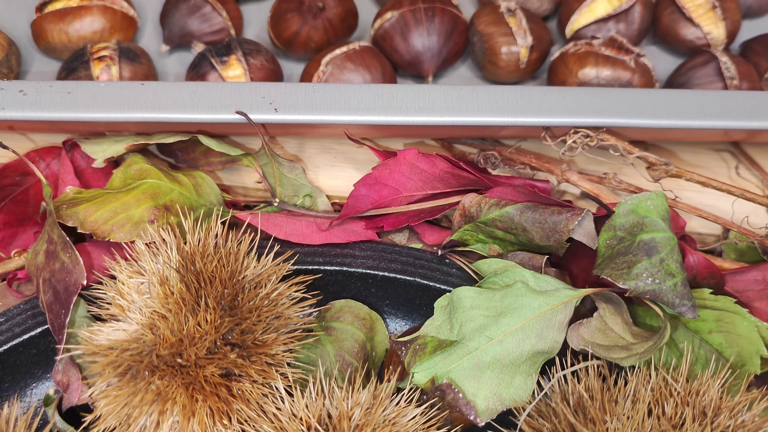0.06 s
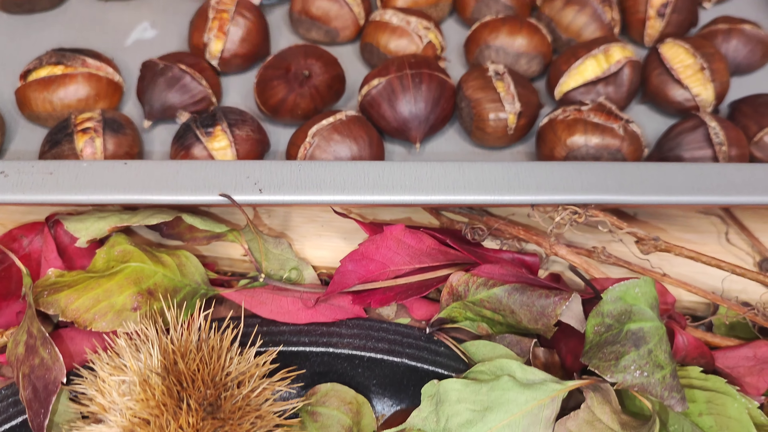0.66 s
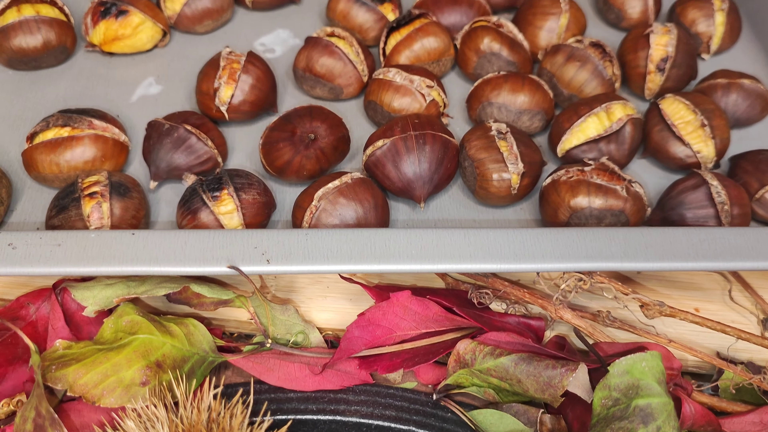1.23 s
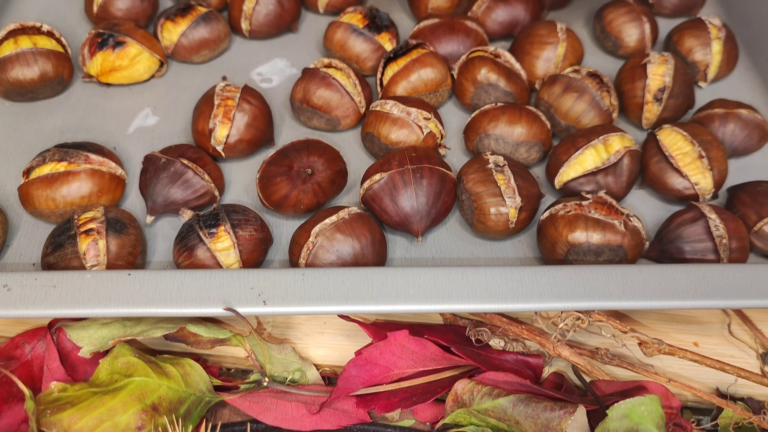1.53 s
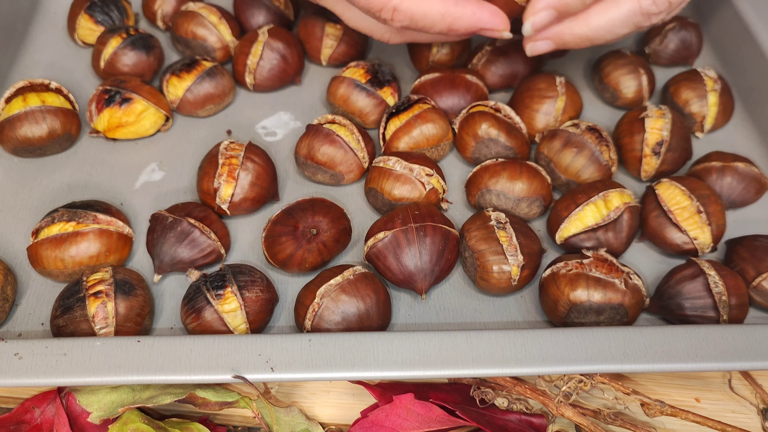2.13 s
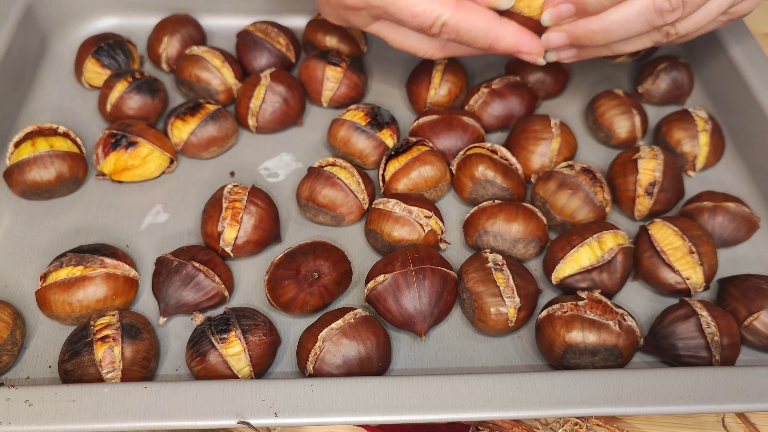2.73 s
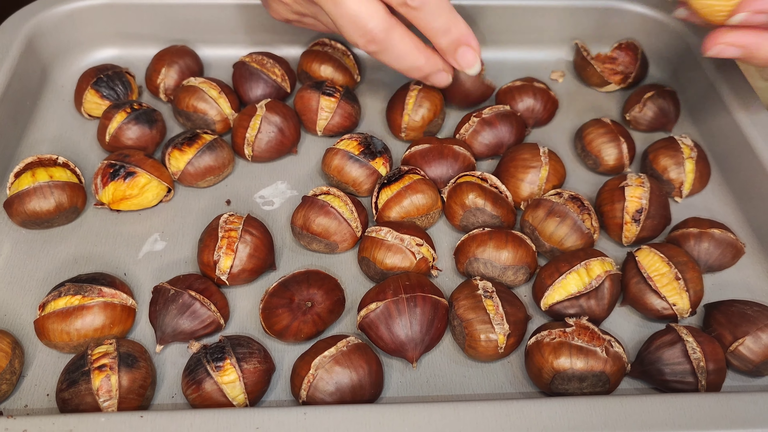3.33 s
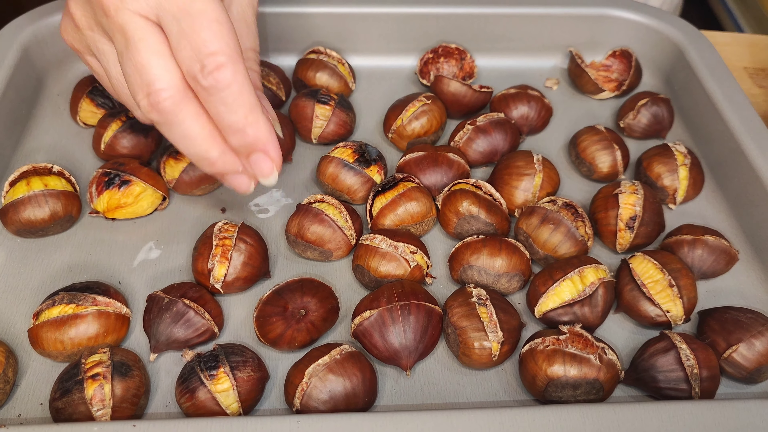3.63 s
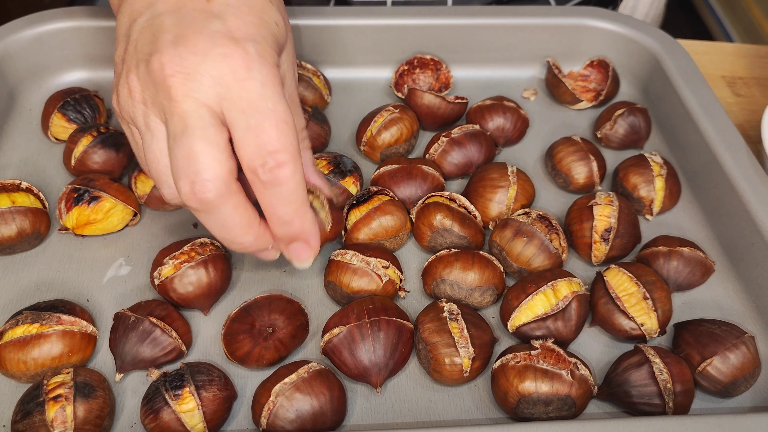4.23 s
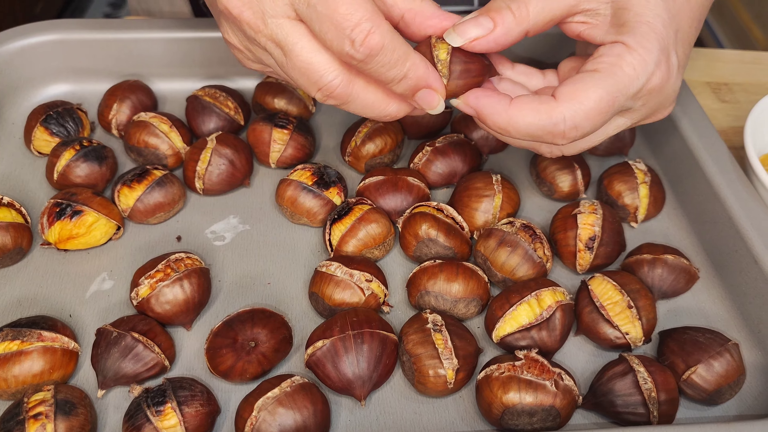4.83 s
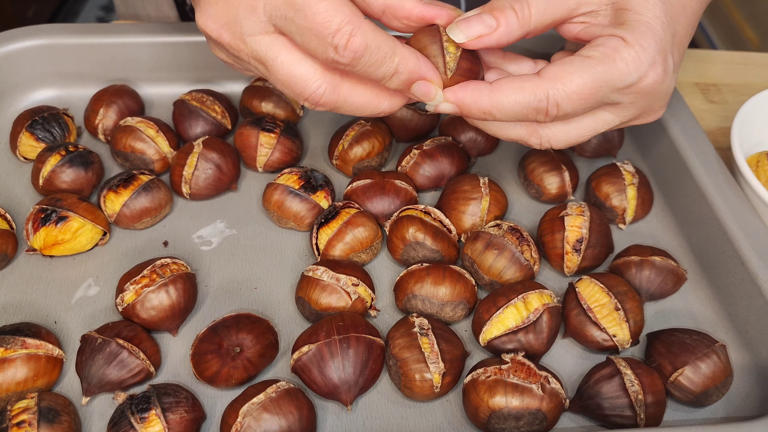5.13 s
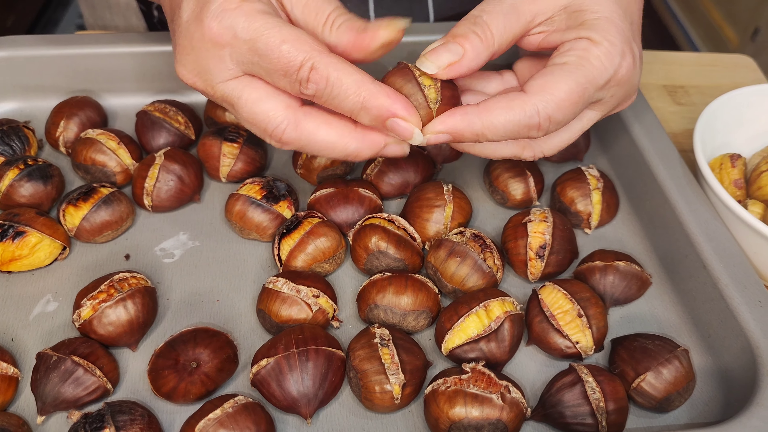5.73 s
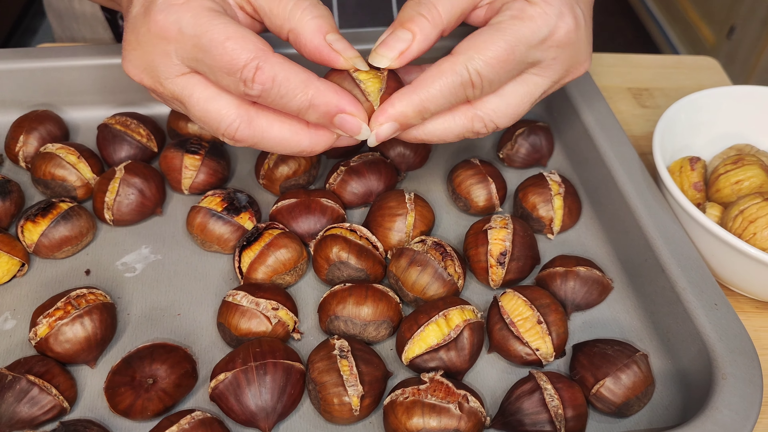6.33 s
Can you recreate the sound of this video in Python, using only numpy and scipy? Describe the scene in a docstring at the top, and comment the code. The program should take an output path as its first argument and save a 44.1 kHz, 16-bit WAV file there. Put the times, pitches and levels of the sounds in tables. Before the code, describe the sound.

Roasted chestnuts roll and knock lightly on a metal baking tray. Fingers rub over one and split its brittle shell in quick runs of crisp snaps. Midway, a piece of shell drops and bounces on the tray with a brief ring, and more nuts are nudged together. The peeling then resumes, ending in a sharp crack. It all sounds close, in a quiet kitchen with short echoes.

```python
"""First, fingers rub softly over a roasted chestnut in a quiet kitchen.
Nudged nuts roll and knock together, and the metal baking tray rings under them.
Each pull splits the brittle shell in a quick run of snaps that share one short hollow ring;
a deep crack also jolts the nut. Midway, a piece of shell drops and bounces on the tray,
then the peeling goes on. The small room answers with short echoes."""
import sys
import numpy as np
from scipy import signal
from scipy.fft import rfft, irfft
from scipy.io import wavfile
from scipy.ndimage import uniform_filter1d

SR = 44100
rng = np.random.default_rng(int(sys.argv[2]) if len(sys.argv) > 2 else 0)


def wav_record(signal):
    """Record a signal, one row per channel, as 16-bit PCM in the file named by sys.argv[1]."""
    frames = np.transpose(np.atleast_2d(signal))
    bounded = np.clip(frames, -1, 1)
    # unit amplitude maps onto the largest positive 16-bit level
    quanta = np.round(bounded * 32767).astype(np.int16)
    wavfile.write(sys.argv[1], SR, quanta)


N = 290001
PULSE_SIZE, TAIL_SIZE = 2048, 22050   # samples in one hit, and in its fading tail
FREQS = np.arange(PULSE_SIZE // 2 + 1) * SR / PULSE_SIZE


def from_db(db):
    """Turn decibels into a number to multiply a sound by."""
    return 10 ** (np.asarray(db) / 20)


def unit(x):
    """Scale a sound so its channels have an average energy of 1."""
    return x / np.sqrt(np.mean(np.sum(x ** 2, axis=-1)) + 1e-20)


def at_hz(points, hz):
    """Read between a table's rows, with octaves evenly spaced."""
    pitch_hz, value = np.transpose(points)
    return np.interp(np.log(hz + 1), np.log(pitch_hz), value)


def fade(fade_s, size):
    """A curve that falls 60 dB in fade_s seconds."""
    return np.exp(-np.log(1000) * np.arange(size) / SR / fade_s)


def bass_and_treble(bass_db, bass_hz, treble_db, treble_hz):
    """Two tone knobs: one for the lows, one for the highs."""
    lows = 1 / (1 + (FREQS / bass_hz) ** 8)
    highs = 1 - 1 / (1 + (FREQS / treble_hz) ** 8)
    return from_db(bass_db * lows + treble_db * highs)


def resonance(hz, sharpness):
    """Let one pitch through fully and weaken those around it."""
    return 1 / np.hypot(1, sharpness * (FREQS / hz - hz / (FREQS + 1)))


def pulse(gain):
    """The shortest click with this tone colour (one gain for each pitch)."""
    cepstrum = irfft(np.log(gain + 1e-9))
    cepstrum[1:PULSE_SIZE // 2] *= 2   # folding onto the first half packs the energy at the start
    cepstrum[PULSE_SIZE // 2 + 1:] = 0
    return irfft(np.exp(rfft(cepstrum)))


def through(x, response):
    """Give a sound the colour and echoes held in a response."""
    return signal.fftconvolve(np.atleast_2d(x), np.atleast_2d(response), axes=1)


def add(track, start_s, sound):
    """Mix a sound into a track."""
    start = max(0, int(start_s * SR))
    part = track[:, start:start + sound.shape[-1]]
    part += sound[..., :part.shape[-1]]


def burst(fade_s, channels):
    """A fading puff of noise, about equally strong at all pitches."""
    noise = rng.standard_normal((channels, PULSE_SIZE)) * fade(fade_s, PULSE_SIZE)
    spectrum = rfft(noise, 2 * PULSE_SIZE)
    colour = np.sqrt(uniform_filter1d(abs(spectrum) ** 2, size=61, axis=1))
    return unit(irfft(spectrum / colour)[:, :PULSE_SIZE])


def contact(run_db, run_fade_s, scatter_db, scatter_fade_s, left_lead_s=0.00023):
    """A touch and a run of smaller ones reach the left side first; hands and tray scatter more."""
    direct = from_db(run_db) * burst(run_fade_s, channels=1)[0]
    direct[0] += 1
    paths = unit(np.array([direct, np.roll(direct, int(left_lead_s * SR))]))
    return unit(paths + from_db(scatter_db) * burst(scatter_fade_s, channels=2))


# How long the kitchen rings: pitch_hz, fade_s
KITCHEN_FADES = [(300, .42), (1300, 0.33), (3500, 0.35), (6000, 0.34), (9500, 0.2), (15000, 0.22)]
def kitchen(echo_s, echo_db, tail_db):
    """A nearby surface sends back one blurred echo; then the room fades, the highs first."""
    edges_hz = np.geomspace(150, 17000, 11)
    tail = np.zeros((2, TAIL_SIZE))
    for low, high in zip(edges_hz, edges_hz[1:]):
        band_filter = signal.butter(2, [low, high], "band", fs=SR, output="sos")
        band = signal.sosfilt(band_filter, rng.standard_normal((2, TAIL_SIZE)))
        tail += band * fade(at_hz(KITCHEN_FADES, np.sqrt(low * high)), TAIL_SIZE)
    swell = 1 - fade(0.0096, TAIL_SIZE)
    response = from_db(tail_db) * unit(tail * swell)
    add(response, echo_s, from_db(echo_db) * burst(0.016, channels=2))
    return response


# Tone colour of the quiet room: pitch_hz, level_db
HUSH_COLOUR = [(20, 2.5), (40, 2), (100, -2.5), (170, -3.5), (280, -6.5), (420, -15.5), (700, -15.5),
               (1200, -21), (2300, -24.5), (5400, -27), (8200, -32), (16000, -31.5)]
def room_hush(level_db):
    """Low rumble and faint hiss come from all directions."""
    noise = rng.standard_normal((2, N + PULSE_SIZE))
    hush = through(noise, pulse(from_db(at_hz(HUSH_COLOUR, FREQS))))
    return from_db(level_db) * np.sqrt(N) * unit(hush[:, PULSE_SIZE:PULSE_SIZE + N])


def friction(strokes, colour, catches_per_s, spread_db, room_db):
    """A sliding surface catches in tiny clicks that swell and fade with each stroke."""
    catches = np.zeros((1, N))
    for middle_s, length_s, db in strokes:
        size = int(length_s * SR)
        clicks = (rng.random(size) < catches_per_s / SR) * rng.choice([-1, 1], size)
        clicks = unit(clicks * from_db(rng.normal(0, spread_db, size)))
        add(catches, middle_s - length_s / 2, from_db(db) * np.sqrt(size) * clicks * np.hanning(size))
    paths = kitchen(echo_s=0.017, echo_db=-12.5, tail_db=room_db)
    add(paths, 0, contact(run_db=-15.5, run_fade_s=0.0058, scatter_db=8, scatter_fade_s=0.037))
    one_catch = pulse(from_db(at_hz(colour, FREQS)))
    return through(catches, unit(through(one_catch, paths)))[:, :N]


# Finger strokes: middle_s, length_s, level_db
FINGER_STROKES = [(.05, .11, -60), (1.11, 0.29, -64.5), (1.37, 0.2, -53), (1.93, 0.31, -54.5),
                  (2.47, 0.16, -69.5), (3.31, 0.35, -59), (4.71, .29, -58.5), (5.2, 0.1, -65.5)]
# Tone colour of skin on shell: pitch_hz, level_db
SKIN_COLOUR = [(300, -21), (1000, -12.5), (2200, -9), (3500, -6.5), (5400, -5.5), (7200, -11.5),
               (9500, -12.5), (16000, -19.5)]
def rubbing_fingers():
    """Skin drags over a shell with a fine, uneven rustle."""
    return friction(FINGER_STROKES, SKIN_COLOUR, catches_per_s=5600, spread_db=8.5, room_db=-7.5)


# Low scrapes: short rolls of nuts on the tray, and one long, low rub of fingers on the shell near 4.8 s:
# middle_s, length_s, level_db
LOW_SCRAPES = [(.33, .071, -52.5), (.53, 0.15, -69.5), (.645, 0.11, -53), (3.936, 0.028, -57),
               (4.17, 0.093, -53.5), (4.35, .056, -55), (4.45, .06, -60.5), (4.78, 0.42, -66.5)]
# Tone colour of a low scrape: pitch_hz, level_db
SCRAPE_COLOUR = [(100, -27), (300, -3), (600, 1), (1100, 2.5), (3000, -2.5), (5000, -8), (8000, -18),
                 (16000, -29)]
def low_scrapes():
    """Nuts roll and scuff on the tray, and fingers rub low on the shell, each with a low, even scrape."""
    return friction(LOW_SCRAPES, SCRAPE_COLOUR, catches_per_s=1300, spread_db=1.0, room_db=-8.5)


# The notes the tray rings with: pitch_hz, level_db, fade_s
TRAY_NOTES = [(440, -15.5, 0.2), (1270, -5.5, 0.27), (1432, 0.5, 0.15), (1690, -6.5, 0.29),
              (1651, -2, 0.068), (2155, -1.5, .2), (2571.5, -8.5, 0.14), (2600, -7, 0.13),
              (3070, -7.5, 0.069)]
def tray_hits(hits, colour, ring_db, clack_s=0.028):
    """A hard shell gives a short woody clack and sets the loaded tray ringing."""
    out, t = np.zeros((2, N)), np.arange(TAIL_SIZE) / SR
    notes = np.array([from_db(db) * np.sin(2 * np.pi * hz * t) * fade(fade_s, TAIL_SIZE)
                      for hz, db, fade_s in TRAY_NOTES])
    # each spot on the tray echoes differently
    rooms = [kitchen(echo_s=0.011, echo_db=-8.5, tail_db=-6.5) for _ in range(4)]
    for k, (start_s, db, bass_db, treble_db) in enumerate(hits):
        tone = bass_and_treble(bass_db, 1000, treble_db, 3600)
        clack = unit(pulse(from_db(at_hz(colour, FREQS)) * tone))
        paths = rooms[k % len(rooms)].copy()
        add(paths, 0, contact(run_db=9.5, run_fade_s=clack_s, scatter_db=1.5, scatter_fade_s=clack_s))
        add(out, start_s, from_db(db) * through(clack, paths))
        signs = rng.choice([-1, 1], (2, len(notes)))
        strengths = signs * from_db(rng.normal(0, 0.91, signs.shape))
        add(out, start_s, from_db(db + ring_db) * unit(strengths @ notes))
    return out


# Bumps between nuts: start_s, level_db, bass_db, treble_db
NUT_KNOCKS = [(0.3096, -24.5, 4, 8), (0.3306, -19, 4, 5), (0.4135, -26.5, 11, -4),
              (0.6121, -22.5, 6.5, -6.5), (0.7708, -16, 5.5, -8.5), (3.9424, -18, 0.5, -0.5),
              (4.0488, -19.5, -2.5, -7), (4.086, -24.5, 3, -5.5), (4.1686, -24.5, 4, -15),
              (4.2881, -34, 12, -16.5), (4.402, -25, 11, 6), (4.4161, -21.5, 17.5, 0)]
# Tone colour of a knock: pitch_hz, level_db
KNOCK_COLOUR = [(100, -57), (300, -10.5), (450, -8), (700, -11), (1100, 1), (1600, -3.5), (2300, -0.5),
                (3300, -5.5), (5000, -12), (8000, -21), (16000, -27)]
def knocking_nuts():
    """Whole nuts are nudged and knock together on the tray."""
    return tray_hits(NUT_KNOCKS, KNOCK_COLOUR, ring_db=-10.5)


# The clear breaks in the shell: start_s, level_db
SHELL_BREAKS = [(0.7187, -32), (1.3168, -12.5), (1.393, -22.5), (1.4944, -11), (1.501, -3.5),
                (1.5493, -10.5), (1.5609, -9.5), (1.5851, -6), (1.6986, -22), (1.7023, -4.5), (1.7215, -8),
                (1.8405, -25.5), (1.8755, -26), (1.8943, -24.5), (1.9608, -17), (2.0572, -10.5),
                (2.0637, -7), (2.5736, -15.5), (2.834, -5), (2.8846, -19.5), (2.964, -18), (2.992, -14.5),
                (3.0059, -13.5), (3.0322, -20.5), (3.0892, -16.5), (3.1051, -12.5), (5.1125, -22.5),
                (5.1614, -25.5), (5.2695, -8), (5.337, -24.5), (5.4073, -6), (5.4333, -15.5), (5.6257, -26),
                (5.652, -14.5), (5.6571, -11), (5.6893, -4.5), (5.7356, -8.5), (6.459, -11), (6.494, -9),
                (6.523, -21), (6.5475, 2.5), (6.5676, -4.5)]
# Each pull loosens one piece, and its cracks share that piece's colour:
# start_s, length_s, ring_hz, ring_share (0 to 1), hollow_db, treble_db
SHELL_PULLS = [(1.181, 0.26, 5600, 0.25, 13, 4.5), (1.472, .07, 5870, 0.51, 8.5, 0.5),
               (1.544, 0.13, 5800, 0.26, -1, 3.5), (1.694, 0.077, 6300, .12, 1.5, 1.5),
               (1.827, 0.11, 5470, 0.04, 6.5, 15), (2.025, 0.032, 5050, 0.1, -18, -9.5),
               (2.484, 0.22, 4270, 0.07, 1, 1.5), (2.789, 0.085, 2820, 0.09, 15, 6),
               (2.943, .18, 3440, 0.4, 5.5, -2), (4.839, .03, 6420, .1, -0.5, 4),
               (5.094, 0.57, 4300, 0.08, -3.5, 3), (5.605, .06, 3750, 0.15, -6, 0),
               (5.664, 0.055, 6350, 0.05, 0, 5), (6.13, 0.079, 4530, 0, 0, -3.5),
               (6.44, .09, 3160, 0.16, 1, 2.5), (6.535, 0.032, 6500, 0.34, -1, -3.5)]
def shell_cracks(ticks_per_s=14, tick_db=-35, tick_spread_db=2.5):
    """List the breaks, plus faint ticks as single fibres give way at random during each pull."""
    breaks, cracks = list(SHELL_BREAKS), []
    for start_s, length_s, *_ in SHELL_PULLS:
        for when, strength in rng.random((int(np.ceil(ticks_per_s * length_s)), 2)):
            breaks.append((start_s + when * length_s, tick_db + tick_spread_db * (2 * strength - 1)))
    pull_starts = [row[0] for row in SHELL_PULLS]
    for start_s, db in breaks:
        pull = max(0, np.searchsorted(pull_starts, start_s) - 1)
        ring_hz, ring_share, hollow_db, treble_db = SHELL_PULLS[pull][2:]
        ring_hz *= np.exp(0.02 * rng.standard_normal())   # no two cracks ring quite alike
        treble_db += 0.17 * (-10 - db)   # the smaller the crack, the brighter
        cracks.append((start_s, db, ring_hz, ring_share, hollow_db, treble_db))
    return cracks


def snapping_shell(hollow_hz, hollow_sharpness, gain_db):
    """Each crack is coloured by the hollow under the shell, and the piece that lets go rings briefly."""
    out = np.zeros((2, N))
    # the nut turns, so the echoes change
    rooms = [kitchen(echo_s=0.009, echo_db=-6.0, tail_db=-4.0) for _ in range(6)]
    for k, (start_s, db, ring_hz, ring_share, hollow_db, treble_db) in enumerate(shell_cracks()):
        hollow = from_db(hollow_db - 6.0) * resonance(hollow_hz, hollow_sharpness) ** 2
        crack = unit(np.hypot(bare_crack(treble_db), hollow))
        ring = unit(resonance(ring_hz, sharpness=3 + 6 * ring_share) ** 2)
        snap = unit(pulse(np.sqrt((1 - ring_share) * crack ** 2 + ring_share * ring ** 2)))
        paths = rooms[k % len(rooms)].copy()
        add(paths, 0, contact(run_db=4.5, run_fade_s=0.0042, scatter_db=4.5, scatter_fade_s=0.017))
        add(out, start_s, from_db(db + gain_db) * through(snap, paths))
    return out


# Tone colour of splitting shell: pitch_hz, level_db
CRACK_COLOUR = [(150, -39.5), (500, -24.5), (950, -22.5), (1400, -12.5), (1900, -14.5), (2600, -12.5),
                (3500, -2.5), (5500, -1), (7400, -3), (9000, -1.5), (12000, -7), (16000, -9)]
def bare_crack(treble_db):
    """The gain at each pitch for one crack: brittle shell sounds broad and bright."""
    return from_db(at_hz(CRACK_COLOUR, FREQS)) * bass_and_treble(0, 1000, treble_db, 9000)


def jolting_nut(wood_hz, wood_sharpness, deep_db, jolt_db):
    """A break louder than deep_db makes the whole nut kick back in the fingers with a dull knock."""
    kicks = np.zeros((1, N))
    for start_s, db in SHELL_BREAKS:
        if db > deep_db:
            add(kicks, start_s, from_db([jolt_db + 0.17 * (db - deep_db)]))
    paths = kitchen(echo_s=0.011, echo_db=-37.5, tail_db=-5.0)
    add(paths, 0, contact(run_db=7, run_fade_s=0.0062, scatter_db=5.5, scatter_fade_s=0.0027))
    knock = unit(pulse(resonance(wood_hz, wood_sharpness) ** 2))
    return through(kicks, through(knock, paths))[:, :N]


# A landing and its bounces: start_s, level_db, bass_db, treble_db
SHELL_BOUNCES = [(3.402, 9, -4.5, 1), (3.4422, 2, -2, -2), (3.4709, -7, -12, 0.5), (3.5177, -17.5, -3.5, 4)]
# Tone colour of light shell on the tray: pitch_hz, level_db
BOUNCE_COLOUR = [(100, -37), (300, -25), (480, -9.5), (750, -7), (950, -12.5), (1280, 2.5), (1650, -1),
                 (1900, -6), (2300, 1), (3300, -6.5), (5000, -17.5), (8000, -25), (16000, -35.5)]
def falling_shell():
    """A piece of shell lands on the tray and bounces, softer each time."""
    return tray_hits(SHELL_BOUNCES, BOUNCE_COLOUR, ring_db=-9.0)


# How the microphone's two openings differ: pitch_hz, left_minus_right_db
SIDE_BALANCE = [(500, 2), (1400, -0.5), (2400, -5), (3400, -6.5), (5000, -7), (8000, -1), (13000, 2.5)]
def microphone_openings(x):
    """Each opening colours the sound from the tray in its own way."""
    half_db = at_hz(SIDE_BALANCE, FREQS) / 2
    return through(x, [pulse(from_db(half_db)), pulse(from_db(-half_db))])[:, :N]


def narrow_bass(x, below_hz, side_db):
    """Long waves reach both openings alike, so low sounds sit nearer the middle."""
    middle, side = (x[0] + x[1]) / 2, (x[0] - x[1]) / 2
    bass_cut = pulse(from_db(side_db / (1 + (FREQS / below_hz) ** 4)))
    side = through(side, bass_cut)[0, :N]
    return np.array([middle + side, middle - side])


def scene():
    """Mix the peeling hands, the nuts on the tray and the quiet kitchen."""
    peeling = snapping_shell(hollow_hz=2379, hollow_sharpness=3.5, gain_db=-0.2)
    peeling += jolting_nut(wood_hz=1290, wood_sharpness=0.36, deep_db=-8.5, jolt_db=-28.5)
    close_sounds = peeling + rubbing_fingers() + falling_shell() + knocking_nuts() + low_scrapes()
    mix = microphone_openings(close_sounds) + room_hush(level_db=-62)
    return narrow_bass(mix, below_hz=700.2, side_db=-5.0)


def record(dry):
    """Cut away the very highest treble, above 16100 Hz."""
    return signal.sosfilt(signal.ellip(10, 0.2, 70, 16100, fs=SR, output="sos"), dry, axis=-1)


dry = scene()
out = record(dry)
wav_record(out)
```